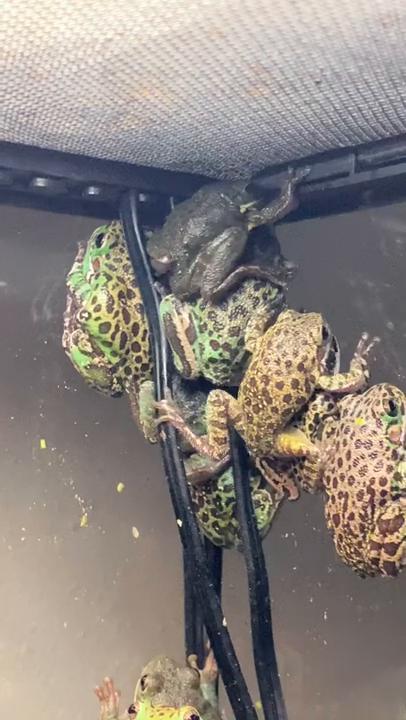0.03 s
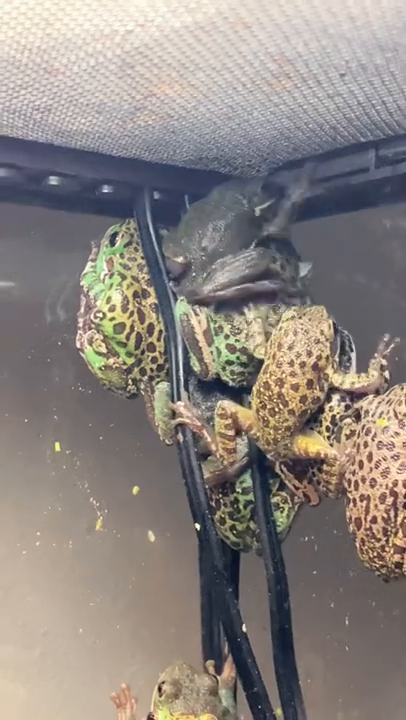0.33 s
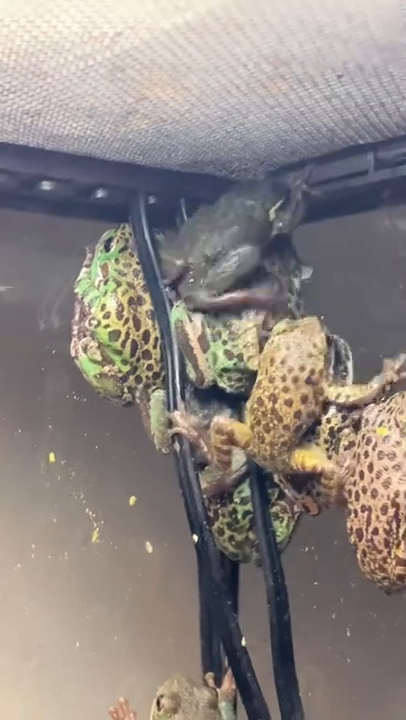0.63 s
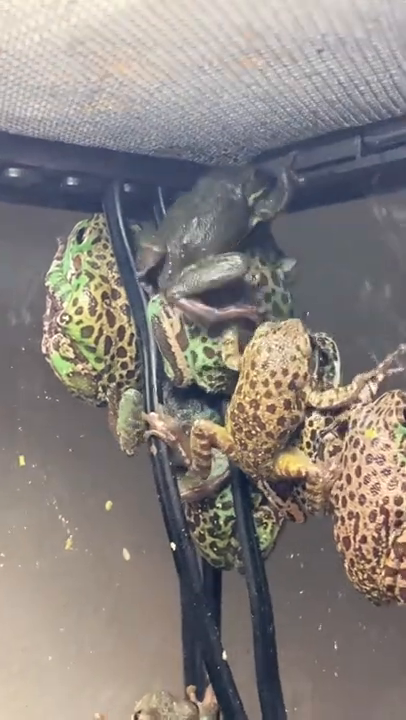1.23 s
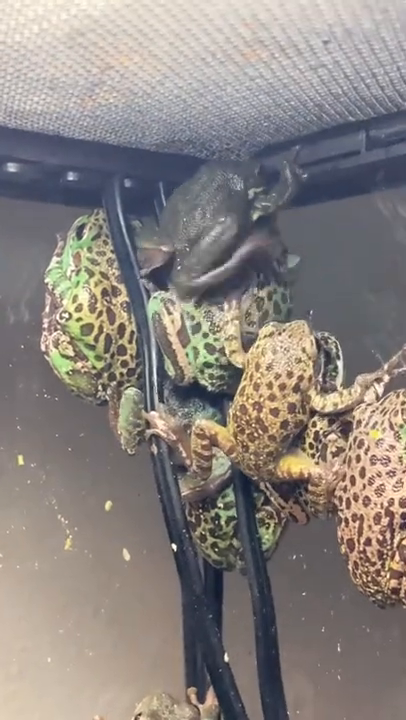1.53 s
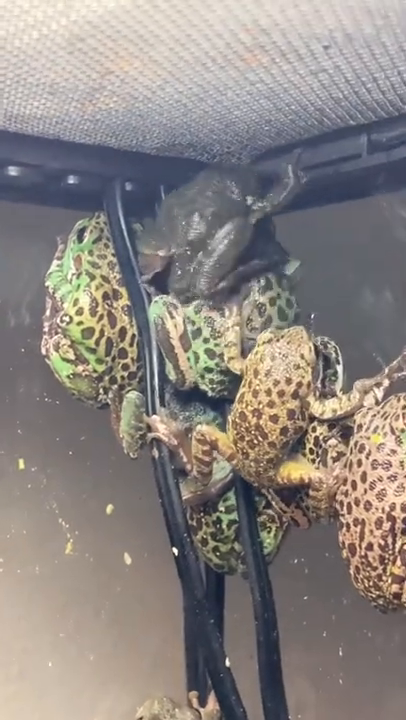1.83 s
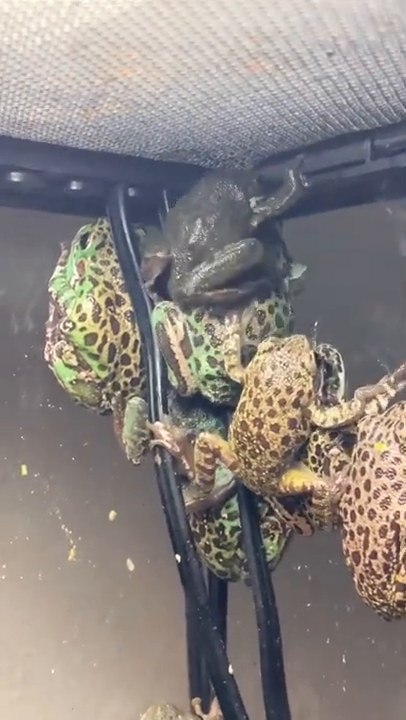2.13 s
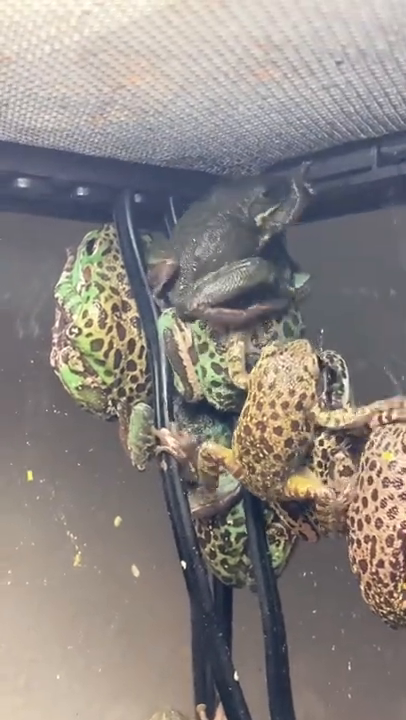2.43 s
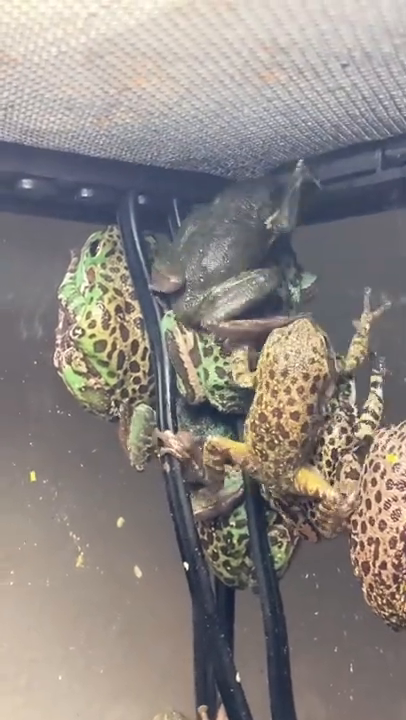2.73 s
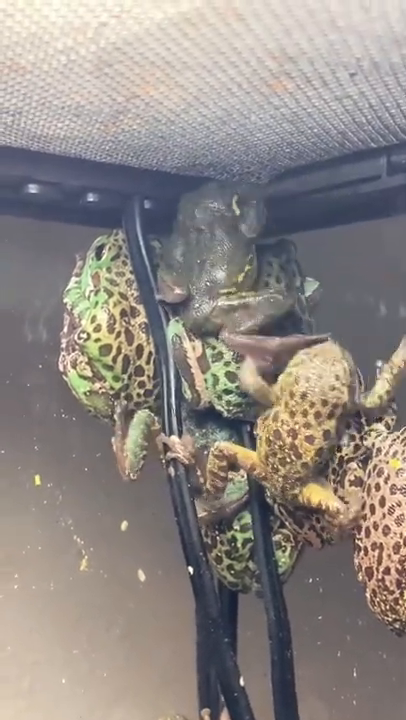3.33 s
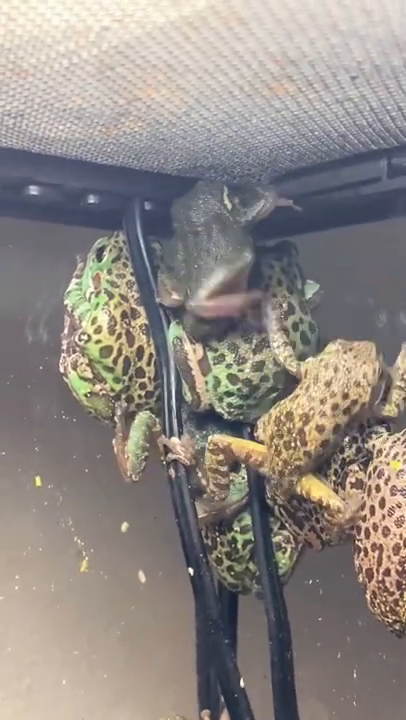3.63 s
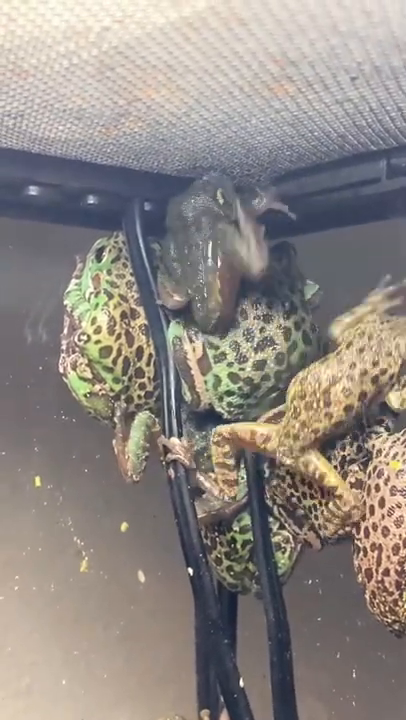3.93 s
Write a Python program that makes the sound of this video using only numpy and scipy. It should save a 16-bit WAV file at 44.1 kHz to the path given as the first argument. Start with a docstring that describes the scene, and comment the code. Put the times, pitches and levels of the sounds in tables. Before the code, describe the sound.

Frogs croak four times up close in a glass tank, each rough rattle breaking into clucks. Small wet pops and a low pump hum continue throughout, with one soft thud as the third croak ends.

```python
"""Tree frogs in a glass tank, close to the microphone. From the start a pump hums under faint room air,
and water and sticky skin make small wet pops and ticks. Half a second in, one frog gives the first of
four croaks: uneven pulses ring its throat and the tank in short rattles, then break up into clucks.
As the third croak ends, a frog bumps the wall. After the fourth, the last second is left to the water,
the skin and the pump."""
import sys
import numpy as np
from scipy import signal
from scipy.fft import rfft, irfft
from scipy.io import wavfile

SR = 44100
rng = np.random.default_rng(int(sys.argv[2]) if len(sys.argv) > 2 else 0)


def output_pcm(signal):
    """Save a mono or channel-first signal as 16-bit PCM at the path in sys.argv[1].

    Samples are clipped to [-1, 1] before scaling.
    """
    pcm = np.clip(np.atleast_2d(signal).T, -1, 1) * 32767
    wavfile.write(sys.argv[1], SR, np.round(pcm).astype(np.int16))


N = 176400
BAND_LIMIT_HZ = 16100


def amp(db):
    """Decibels to gain."""
    return 10 ** (np.asarray(db) / 20)


def unit_rms(x):
    """Scales to rms 1."""
    return x / np.sqrt(np.mean(x ** 2) + 1e-20)


def curve_at(points, hz):
    """Reads a table on a log-frequency axis."""
    freqs, values = np.transpose(points)
    return np.interp(np.log(hz + 1), np.log(freqs), values)


def add(mix, start_s, sound):
    """Mixes a sound in at a time."""
    part = mix[max(round(start_s * SR), 0):][:len(sound)]
    part += sound[:len(part)]


def delay(x, lag_s):
    """The same sound a moment later."""
    return irfft(rfft(x) * np.exp(-2j * np.pi * np.fft.rfftfreq(N, 1 / SR) * lag_s), N)


def colour(x, spectrum, size=8192):
    """Minimum-phase filter with the given spectrum."""
    hz = abs(np.fft.fftfreq(size, 1 / SR))
    log_gain = np.log(amp(curve_at(spectrum, hz)))
    response = np.exp(np.conj(signal.hilbert(log_gain)))
    impulse = np.fft.ifft(response).real[:size // 2]
    return signal.fftconvolve(x, impulse)[:N]


def blip(hz, cycles):
    """A short damped tone that peaks after the given number of cycles."""
    turns = hz * np.arange(SR // 50) / SR
    return turns / cycles * np.exp(1 - turns / cycles) * np.sin(2 * np.pi * turns)


def mode(hz, t60_s, lag_s=0):
    """The ring of one resonance, with gain 1 at its pitch."""
    t = np.arange(SR // 4) / SR
    decay = np.log(1000) / t60_s
    return 2 * decay / SR * np.exp(-decay * t) * np.cos(2 * np.pi * hz * (t - lag_s))


def shower(per_s, hz, octaves, floor_db, spread_db):
    """Random pops, mostly small, a few larger: start_s, pitch_hz, level_db."""
    when, rank, size = rng.random((int(per_s * N / SR), 3)).T
    pitch_hz = hz * 2 ** (octaves * np.log(rank / (1 - rank)) / 2)
    level_db = floor_db + spread_db * np.minimum(-np.log(size), 3.5)
    return list(zip(when * N / SR, np.minimum(pitch_hz, BAND_LIMIT_HZ), level_db))


# Air in the room around the tank: frequency_hz, gain_db
AIR_SPECTRUM = [(330, 9.5), (480, -0.5), (600, 10), (740, -12), (1600, -8), (4000, -11), (16000, -27)]

def room_air(level_db=-52):
    """A faint wash of air, different on each side of the microphone."""
    return amp(level_db) * np.array([unit_rms(colour(rng.standard_normal(N), AIR_SPECTRUM))
                                     for _ in range(2)])


# Mains harmonics of the pump: pitch_hz, level_db
PUMP_HUM = [(59.5, -50), (120, -42.5), (240, -59.5), (360, -59.5)]
# Its rumble: frequency_hz, gain_db
RUMBLE_SPECTRUM = [(20, -21), (38, -9.5), (56, 5), (74, -3), (96, -1.5), (180, -13), (480, -33),
                   (1200, -84)]

def pump(pan_db=1.74):
    """Mains hum and low rumble, a little to the right of the microphone."""
    t = np.arange(N) / SR
    hum = sum(amp(db) * np.sqrt(2) * np.sin(2 * np.pi * (hz * t + rng.random())) for hz, db in PUMP_HUM)
    rumble = amp(-45.5) * unit_rms(colour(rng.standard_normal(N), RUMBLE_SPECTRUM, size=32768))
    return (hum + rumble) * amp([[-pan_db], [pan_db]])


# Echo decay inside the tank: frequency_hz, t60_s
GLASS_DECAY = [(600, 0.11), (1300, 0.16), (3500, 0.093), (10000, 0.056)]

def glass_echoes(x, size=12000):
    """Dense reflections between the glass walls, different left and right."""
    t = np.arange(size) / SR
    taps = rng.choice([-1., 1.], (2, size)) * (rng.random((2, size)) < .2) * (t > .001)
    hz, age_s, spectra = signal.stft(taps, SR, nperseg=128)
    fade = amp(-60 * age_s / curve_at(GLASS_DECAY, hz)[:, None])
    tail = signal.istft(spectra * fade, SR, nperseg=128)[1]
    tail /= np.linalg.norm(tail, axis=1, keepdims=True)
    return signal.fftconvolve(x[None], tail, axes=1)[:, :N]


# Damp skin peeling off: start_s, pitch_hz, relative_db
SKIN_PEELS = [(.73, 6200, 0.5), (1.33, 6800, -1), (1.51, 6300, -0.28), (3.175, 4500, 3)]

def wet_crackle(cycles=2.2, peel_s=.029):
    """A fine wet fizz, with a cluster of ten clicks wherever skin peels off."""
    crackle = np.zeros(N)
    for start_s, hz, db in shower(per_s=160, hz=4500, octaves=.39, floor_db=-51.5, spread_db=3):
        add(crackle, start_s, amp(db) * blip(hz, cycles))
    for start_s, hz, db in SKIN_PEELS:
        for when, pitch, size in rng.random((10, 3)):
            click = size * amp(db - 37) * blip(hz * 2 ** (pitch - .5), cycles)
            add(crackle, start_s + peel_s * when, click)
    return crackle


# Larger bubbles: start_s, pitch_hz, relative_db
LARGE_BUBBLES = [(0.036, 1376, 7), (.196, 2000, -4.5), (.255, 1585, 1.5), (.309, 1600, -4), (0.46, 1880, 2),
                 (0.76, 1910, 5.5), (0.869, 1630, 1.5), (1.17, 1700, 1.5), (1.745, 1840, -2.5),
                 (3.218, 2470, 1), (3.445, 2480, 4.5), (3.547, 2096, 2), (3.705, 2530, -1.5),
                 (3.79, 2170, -1), (3.872, 2190, 6.5)]
# Resonances of the space over the water: pitch_hz, relative_db
OVER_WATER_MODES = [(1490, 2.5), (1640, -3), (1790, -7), (2010, 3.5), (2360, 2.5), (2780, 8)]

def bubbles():
    """Bubbles plink and ring the space over the water; pops and crackle reach the mic off the glass."""
    pops, plinks = np.zeros((2, N))
    large = [(start_s, hz, db - 31) for start_s, hz, db in LARGE_BUBBLES]
    simmer = shower(per_s=95, hz=1985, octaves=.32, floor_db=-47.5, spread_db=4)
    for start_s, hz, db in large + simmer:
        add(pops, start_s, amp(db) * blip(hz, cycles=.61))
        add(plinks, start_s, amp(db - 9) * blip(hz, cycles=3.2))
    space = sum(amp(db + 5.5) * mode(hz, t60_s=.06) for hz, db in OVER_WATER_MODES)
    ring = signal.fftconvolve(pops, space)[:N]
    return plinks + ring + glass_echoes(pops + wet_crackle())


# Sharp wet ticks: start_s, pitch_hz, relative_db
SHARP_TICKS = [(0.305, 9100, -7.5), (0.482, 11300, -7.5), (0.543, 11900, -8.5), (1.084, 9500, -6),
               (1.536, 6400, -11.5), (2.687, 11900, -5), (2.783, 9800, 2.5), (2.892, 10000, -7),
               (3.297, 10300, -8), (3.543, 11300, -3), (3.633, 10200, -7), (3.918, 10700, -7.5),
               (3.988, 11800, -2.5)]

def spatter():
    """Tiny bright ticks of water and wet skin, reaching the two microphone ports out of step."""
    ticks = np.zeros(N)
    sharp = [(start_s, hz, db - 23) for start_s, hz, db in SHARP_TICKS]
    faint = shower(per_s=70, hz=11480, octaves=.43, floor_db=-47.5, spread_db=5.5)
    for start_s, hz, db in sharp + faint:
        add(ticks, start_s, amp(db) * blip(hz, cycles=.94))
    left = ticks + amp(6.5) * glass_echoes(ticks)[0]
    return np.array([left, -delay(left, lag_s=.000224)])


# The two contacts of one bump on the wall: start_s, relative_db
BUMP_CONTACTS = [(2.222, -0.5), (2.249, 4)]
# Its dull thud: frequency_hz, gain_db
THUD_SPECTRUM = [(40, -14), (110, 2.5), (300, -10.5), (650, -16.5), (2500, -41)]

def wall_bump(decay_s=.03):
    """A frog's soft body thuds against the glass, heard in the centre."""
    t = np.arange(SR // 4) / SR
    contacts = np.zeros(N)
    for start_s, db in BUMP_CONTACTS:
        add(contacts, start_s, amp(db - 13.5) * np.exp(-t / decay_s) * rng.standard_normal(len(t)))
    return colour(contacts, THUD_SPECTRUM)


# Air modes of the tank at the microphone: pitch_hz, left_db, right_db
TANK_MODES = [(824.6, 16.5, 5.5), (935.6, 11, 4), (1067, 11.5, 7), (1115, 5.5, 8), (1186, 14, 12.5),
              (1361, 11, 9), (1601, 14.5, 1), (2281, 17, 11.5), (2583, 10, 6.5), (2990, 12.5, 7.5),
              (3770, 13.5, 3)]

def tank_ring(x, t60_s=.072):
    """The air in the tank rings on at its modes, a little later on the right."""
    left = sum(amp(db) * mode(hz, t60_s) for hz, db, _ in TANK_MODES)
    right = sum(amp(db) * mode(hz, t60_s, lag_s=.00016) for hz, _, db in TANK_MODES)
    return signal.fftconvolve(x[None], np.array([left, right]), axes=1)[:, :N]


# Rattles and clucks of the four croaks: start_s, length_s, relative_db, brightness_db
CROAK_RATTLES = [(0.51, .014, -6, -2.5), (0.532, .025, -0.5, -2.5), (0.573, .016, -2.5, 3.5),
                 (0.598, .011, -0.5, 1.5), (0.611, .018, 1, 5), (0.633, .002, 2, 2), (0.665, .008, 0, 3),
                 (0.715, .012, -3.5, 2.5), (0.772, .002, -3.5, 4.5), (0.792, .002, -5, 2),
                 (1.222, .025, -11, 0.5), (1.269, .013, 1, -1), (1.287, .002, 1, -2.5),
                 (1.311, .013, 4, -0.5), (1.325, .012, -1, 1.5), (1.353, .014, 1.5, 1.5),
                 (1.379, .002, -0.5, -1), (1.396, .008, 3, 2), (1.404, .002, 2, -1),
                 (1.929, .033, -1, -2.5), (1.987, .033, 3, 2), (2.047, .009, 1.5, 3.5),
                 (2.097, .015, -1, 2), (2.197, .009, -6, 1), (2.58, .017, -11, 0.5), (2.618, .016, 2, -1.5),
                 (2.657, .009, 3.5, 1.5), (2.675, .002, 2, 1), (2.693, .002, 4.5, 1), (2.707, .024, 2, 3.5),
                 (2.765, .002, 3, 1), (2.810, .008, -0.5, 2.5), (2.870, .002, -0.5, 2),
                 (2.925, .01, -6, 0.5)]
# Resonance of the throat: frequency_hz, gain_db
THROAT_SPECTRUM = [(430, -24), (680, -7.5), (800, -1), (1150, 1), (1900, -7.5)]
# Rasp of the pulses: frequency_hz, gain_db
RASP_SPECTRUM = [(600, -25.5), (1400, -6), (1900, -13), (2300, -3.5), (3000, -8.5), (3900, -12.5),
                 (4120, -23), (4600, -17), (5200, -26.5), (10000, -52)]

def croaks(base_gap_s=.0049, base_hz=1136, sag_db_per_s=67):
    """Close up, uneven pulses strike a frog's throat; brighter rattles are higher, slower and raspier."""
    tones, clicks = np.zeros((2, N))
    t = np.arange(SR // 100) / SR
    for start_s, length_s, db, bright_db in CROAK_RATTLES:
        jitter, bend = rng.standard_normal((2, 16))
        fuzz = .14 * rng.standard_normal((16, len(t))) * np.exp(-t / .0026)  # noise after each click
        gap_s = base_gap_s * 2 ** (.1 * bright_db)
        for k in range(1 + int(length_s / gap_s)):
            after_s = gap_s * (k + .12 * jitter[k] * (k > 0))
            push = amp(db - sag_db_per_s * after_s)
            hz = base_hz * 2 ** (.17 * bright_db + .07 * bend[k])
            add(tones, start_s + after_s, push * amp(-21.5) * blip(hz, cycles=.31))
            add(clicks, start_s + after_s, push * amp(bright_db - 2.5) * ((t == 0) + fuzz[k]))
    throat = colour(tones, THROAT_SPECTRUM)
    rasp = colour(clicks, RASP_SPECTRUM)
    voice = throat + rasp
    direct = throat + amp(4) * rasp  # more rasp on the straight path to the microphone
    close = np.array([direct, delay(direct, lag_s=.00009)])
    return close + amp(3) * glass_echoes(voice) + tank_ring(voice)


def scene():
    """Frogs and water in the tank, with the pump and the room behind them."""
    return croaks() + bubbles() + spatter() + wall_bump() + pump() + room_air()


def record(dry):
    """The stereo microphone opens after 35 ms and cuts off the highest treble."""
    opened = dry * (np.arange(N) / SR > .035)
    lowpass = signal.firwin(255, BAND_LIMIT_HZ, window=("kaiser", 9), fs=SR)
    return signal.oaconvolve(opened, lowpass[None], "same")


dry = scene()
out = record(dry)
output_pcm(out)
```